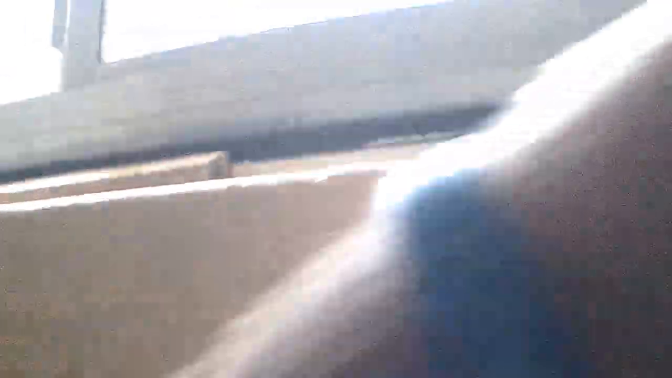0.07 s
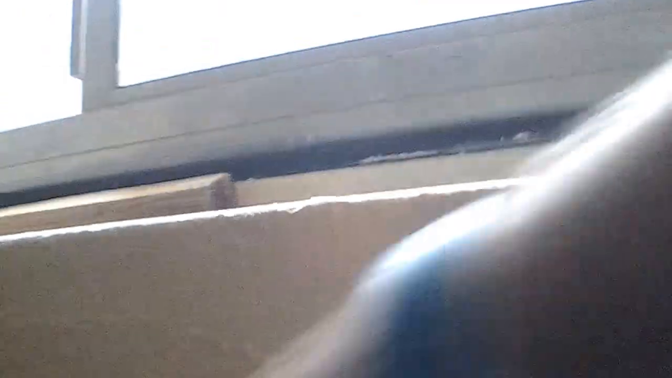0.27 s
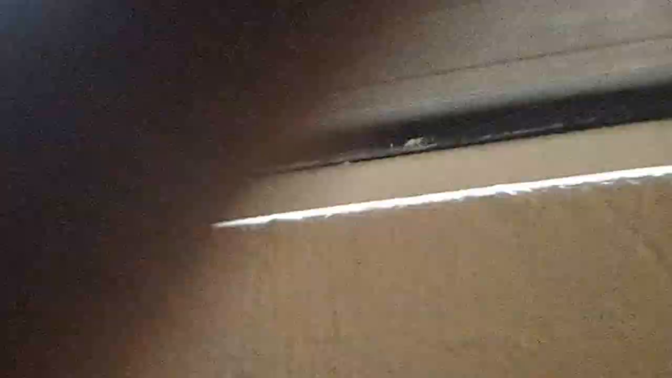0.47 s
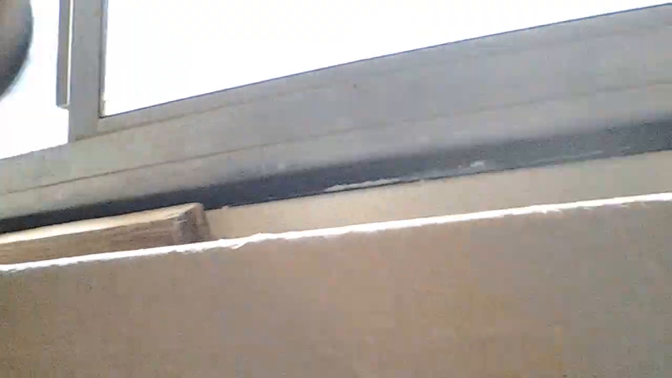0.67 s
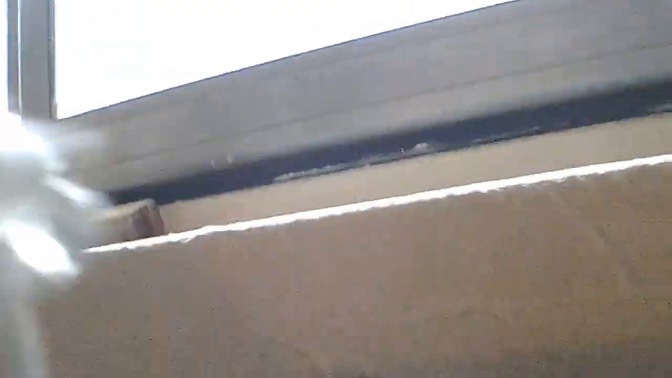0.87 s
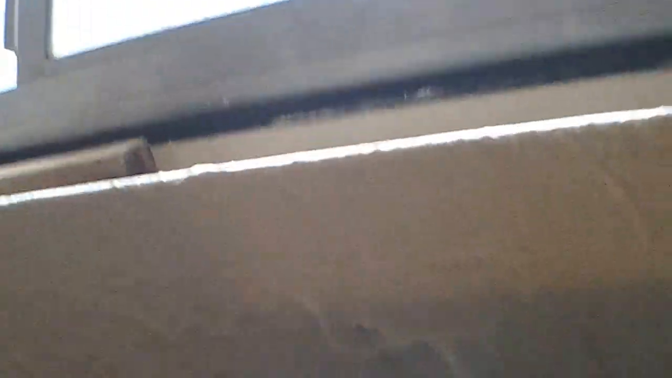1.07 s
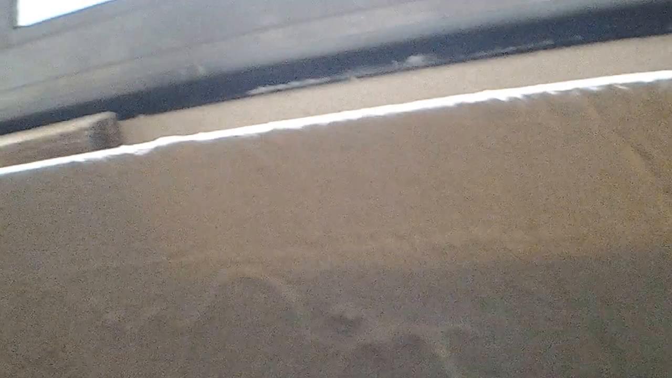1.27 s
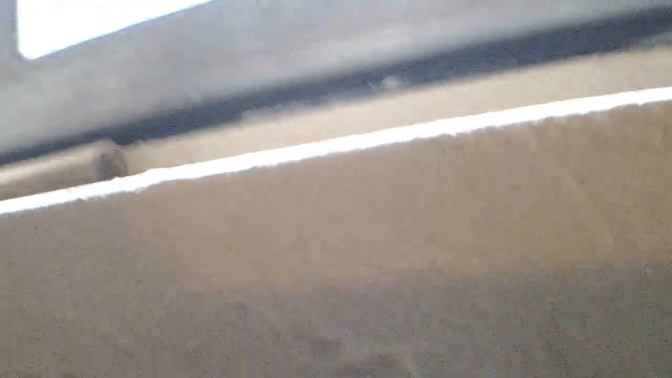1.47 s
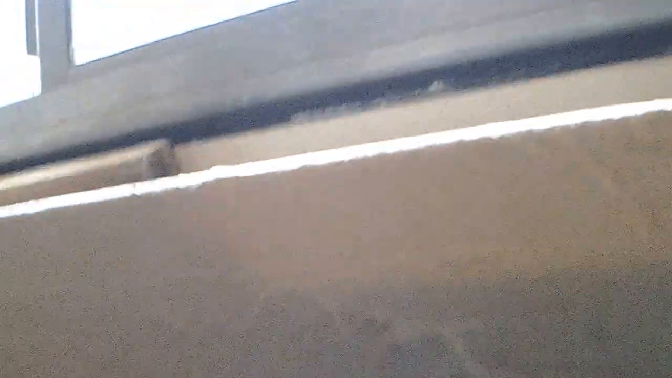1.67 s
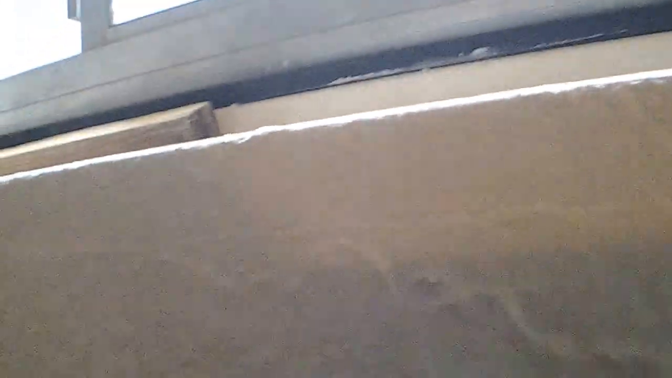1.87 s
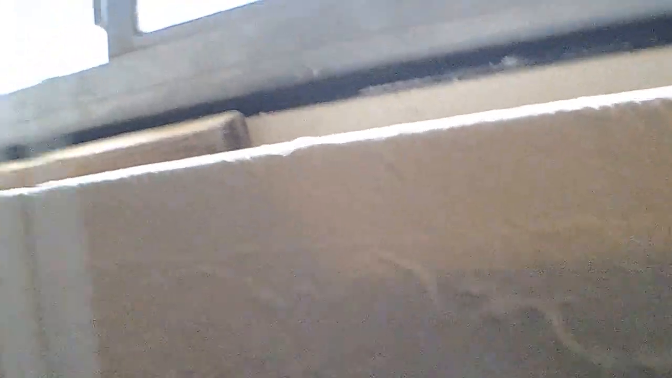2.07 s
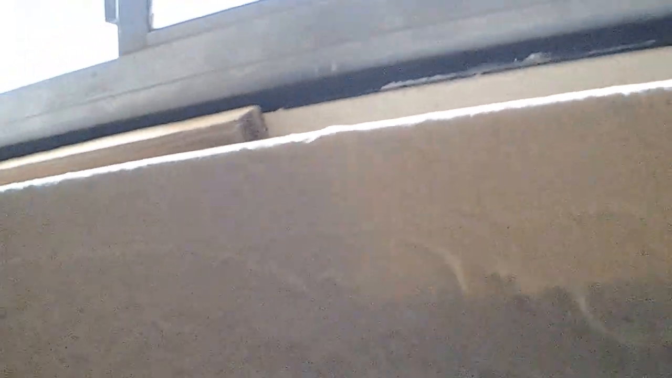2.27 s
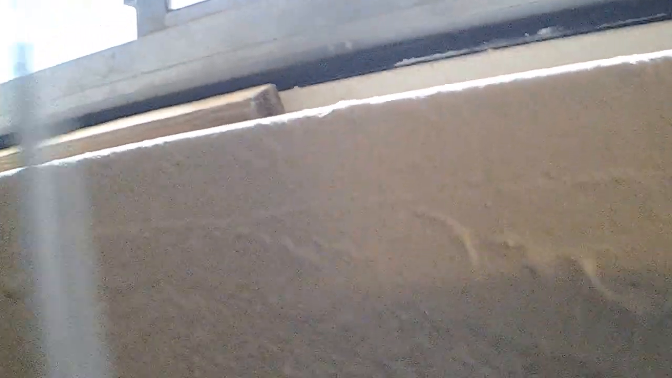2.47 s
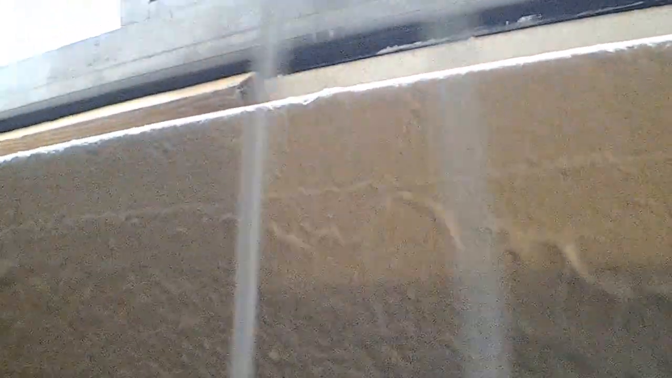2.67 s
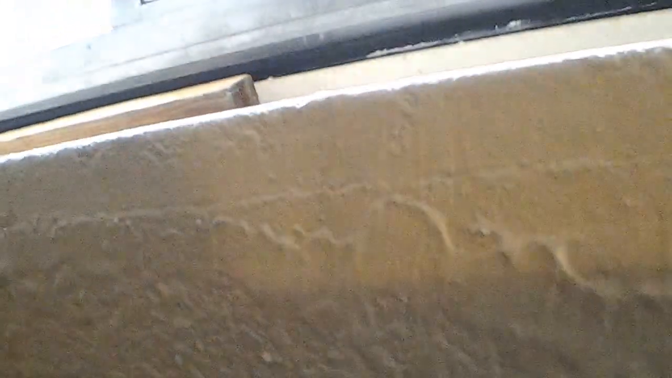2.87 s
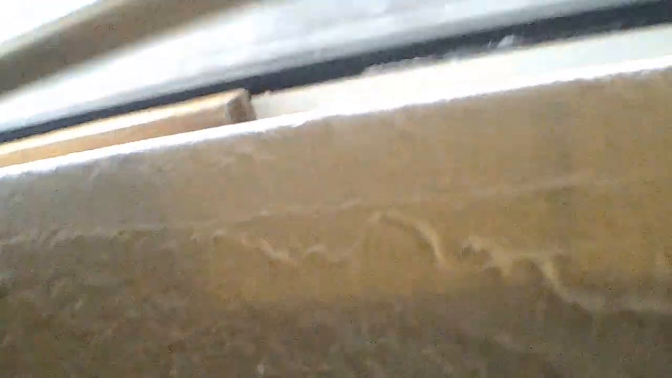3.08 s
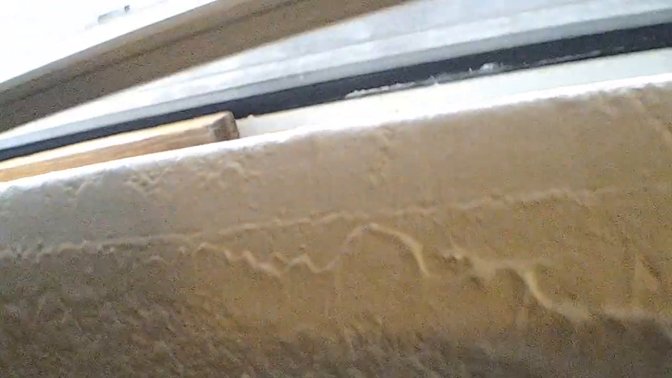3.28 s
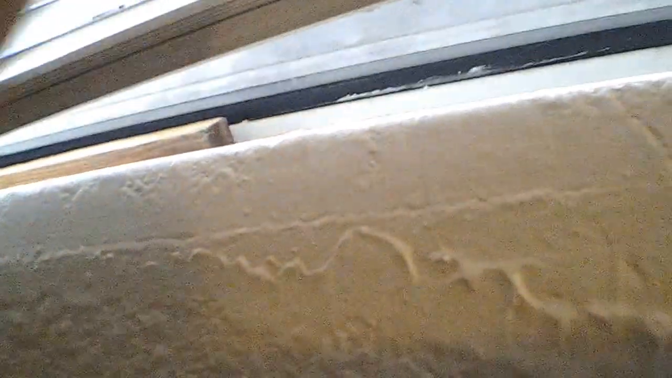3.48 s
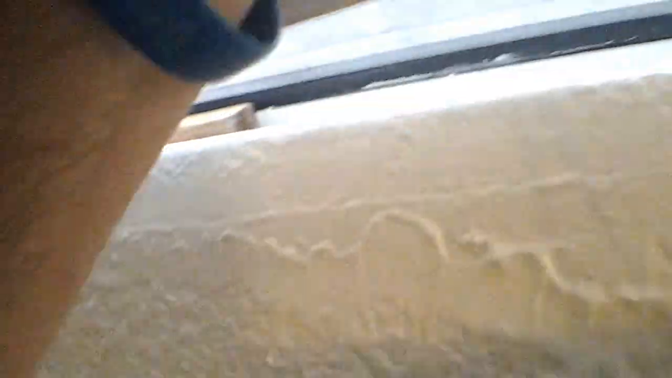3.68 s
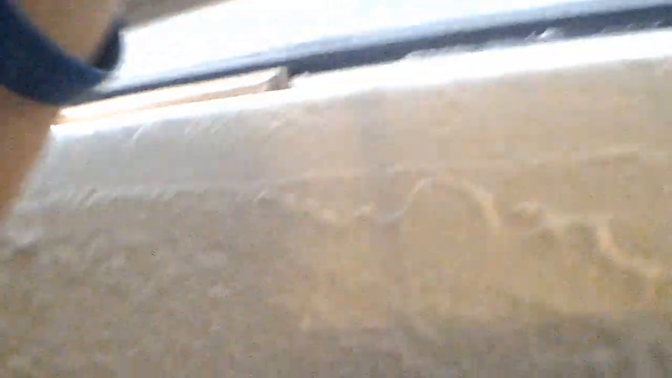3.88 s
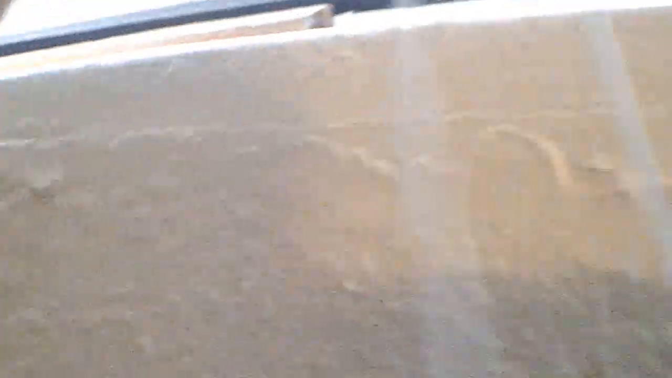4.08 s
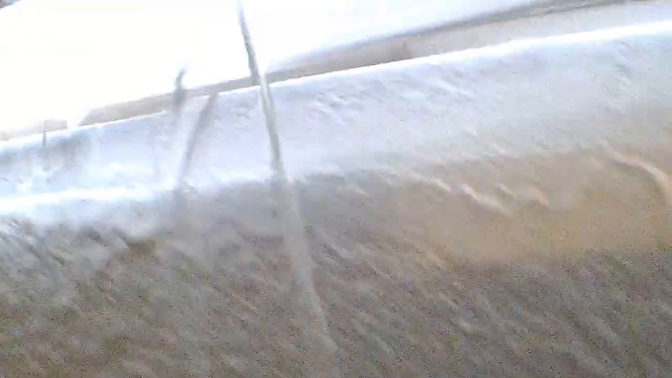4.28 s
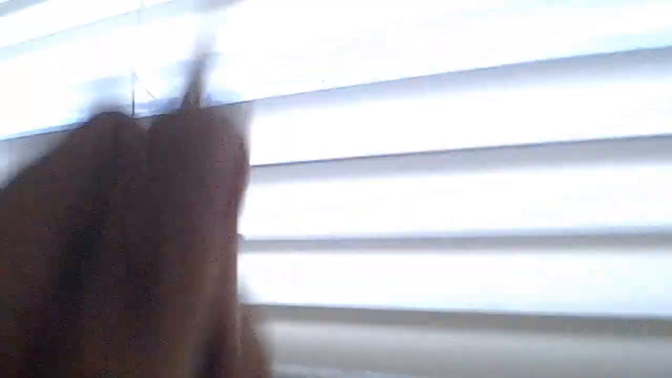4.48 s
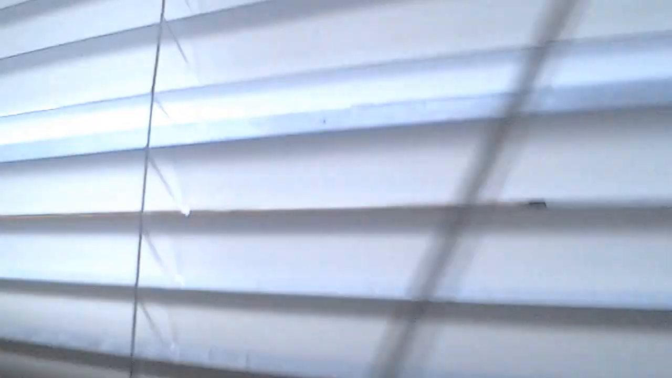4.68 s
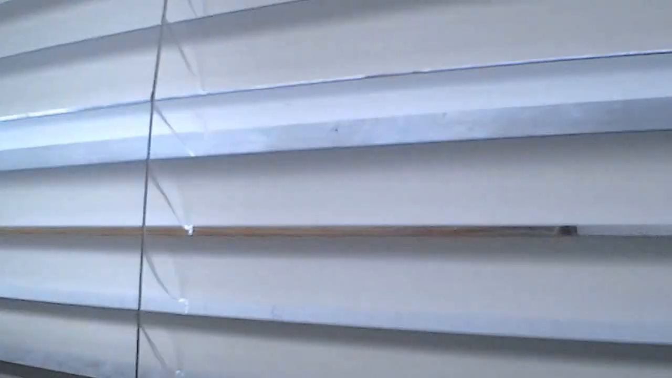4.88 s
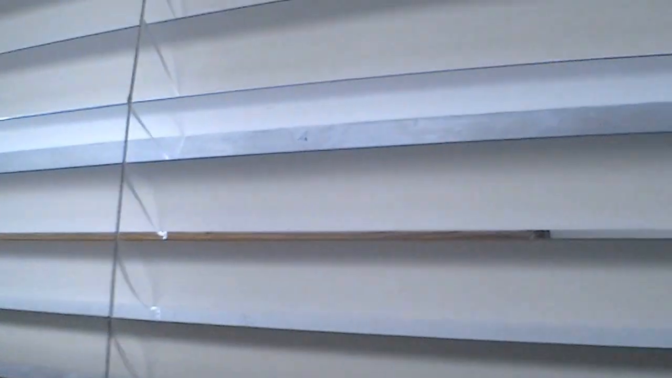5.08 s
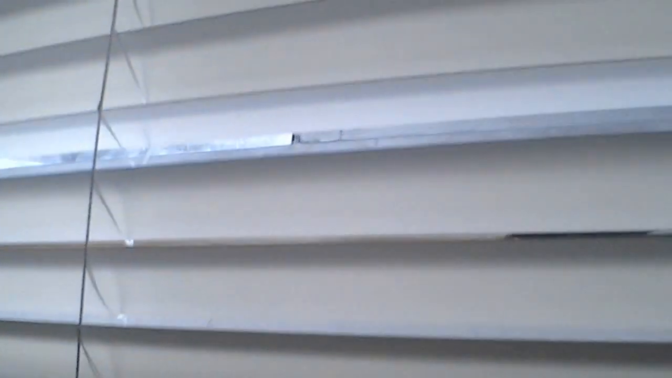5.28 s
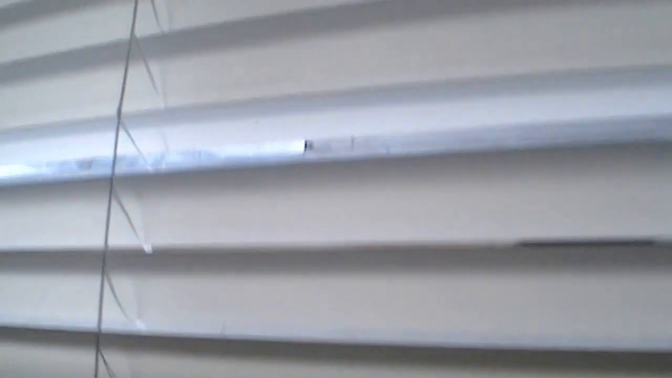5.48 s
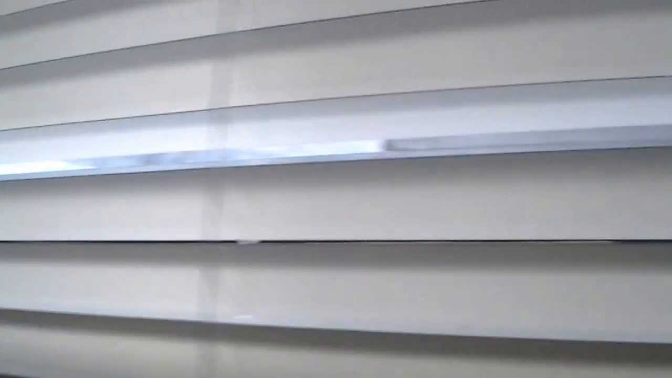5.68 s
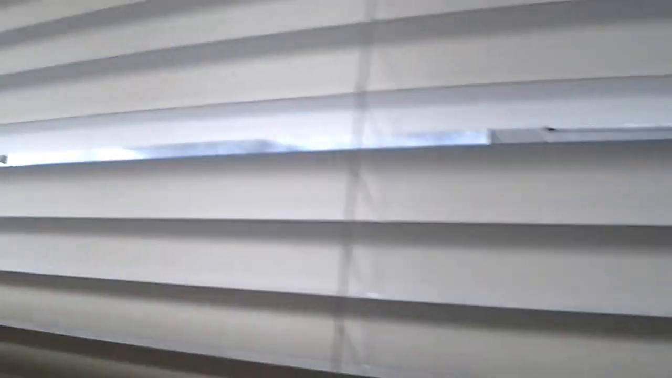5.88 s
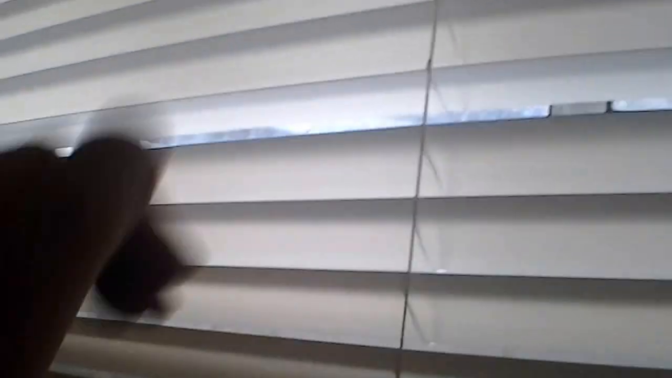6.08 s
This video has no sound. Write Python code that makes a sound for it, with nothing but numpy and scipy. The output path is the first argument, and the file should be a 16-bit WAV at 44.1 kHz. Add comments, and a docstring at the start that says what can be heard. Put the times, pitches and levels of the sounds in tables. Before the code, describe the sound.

Slats of a window blind clatter in bursts close to the microphone, camera bumps thud softly, then the bottom rail cracks down hard and echoes away.

```python
"""Over hiss and a distant rumble in a bare room, the cord pulls a horizontal blind up, close to a hand-held camera.
Filtered noise makes the slats chatter and snap and the cord sing; soft pulses bump the camera while it is held.
The slats chatter again as the blind comes down; the bottom rail lands with a clack of noise and decaying sines
that overloads the microphone. Late slat strikes and one high sine ping fade into the noise tail of the room."""
import sys
import numpy as np
from scipy import signal
from scipy.io import wavfile
from scipy.ndimage import uniform_filter1d

SR = 44100
rng = np.random.default_rng(int(sys.argv[2]) if len(sys.argv) > 2 else 0)


def output_pcm(signal):
    """Save a mono or channel-first signal as 16-bit PCM at the path in sys.argv[1].

    Samples are clipped to [-1, 1] before scaling.
    """
    pcm = np.clip(np.atleast_2d(signal).T, -1, 1) * 32767
    wavfile.write(sys.argv[1], SR, np.round(pcm).astype(np.int16))


N = 269759  # samples
EDGE_HZ = 14750  # upper band limit of the sound


def gain_of(db):
    """Decibels to amplitude."""
    return 10 ** (np.asarray(db) / 20)


def evened(x):
    """Scales to rms 1."""
    return x / np.sqrt(np.mean(x ** 2) + 1e-20)


def read(points, hz):
    """Joins (Hz, value) points on a log-frequency axis."""
    f, value = np.transpose(points)
    return np.interp(np.log(hz + 1), np.log(f + 1), value)


def add(mix, s, sound):
    """Mixes a sound in at time s."""
    part = mix[max(round(s * SR), 0):][:len(sound)]
    part += sound[:len(part)]


def colour(x, points, size=2048):
    """Minimum-phase EQ with the given (Hz, dB) curve, so attacks stay sharp."""
    curve_db = read(points, abs(np.fft.fftfreq(size, 1 / SR)))
    log_gain = np.log(gain_of(curve_db))
    taps = np.fft.ifft(np.exp(np.conj(signal.hilbert(log_gain)))).real
    return signal.oaconvolve(x, taps)[:len(x)]


def band(x, edges, order=4):
    """Band-pass between two frequencies."""
    return signal.sosfilt(signal.butter(order, edges, "band", fs=SR, output="sos"), x)


def resonate(x, hz, width):
    """A resonance of gain 1 at its centre."""
    return signal.lfilter(*signal.iirpeak(hz, hz / max(width, 1), fs=SR), x)


# noise floor EQ, per Hz: f/Hz, relative level/dB
HISS_EQ = [(30, 5.5), (140, 7.5), (250, 0.5), (1000, -4), (5000, -7), (6200, -13), (14500, -9)]
HISS_DB = -64.5  # rms
# rumble EQ, per Hz: f/Hz, relative level/dB
RUMBLE_EQ = [(40, -9), (70, -15.5), (135, -0.5), (320, -1.5), (600, -7), (1300, -12), (9000, -21)]
# rumble fader: t/s, rms level/dB
RUMBLE_LEVEL = [(0, -64.5), (.5, -70), (.8, -57), (3.5, -58.5), (5.101, -63.5), (5.4, -56.5), (6.1, -56)]


def background():
    """Microphone hiss is steady coloured noise; the distant rumble from outside is darker noise that rises and falls."""
    hiss, rumble = rng.standard_normal((2, N))
    rumble_db = np.interp(np.arange(N) / SR, *np.transpose(RUMBLE_LEVEL))
    steady = gain_of(HISS_DB) * evened(colour(hiss, HISS_EQ))
    return steady + gain_of(rumble_db) * evened(colour(rumble, RUMBLE_EQ))


# reverb tail by frequency: f/Hz, t60/s, relative level/dB
ROOM = [(154.3, 1.3, 9.5), (497.4, 1.09, 0.5), (1320, 0.9, -1.5), (3043, 0.65, 0.5), (5660, 0.73, -3),
        (7500, 0.42, 5), (12800, 0.12, 5)]


def room(x, wet_db=-2, build_up=0.0038):
    """Hard walls return a dense noise tail with its own decay at each pitch, shortest at the very top."""
    rows = np.array(ROOM)
    hz, t, z = signal.stft(rng.standard_normal(SR), SR, nperseg=256)
    start_db = read(rows[:, ::2], hz)[:, None]
    t60 = read(rows[:, :2], hz)[:, None]
    tail = signal.istft(z * gain_of(start_db - 60 * t / t60), SR, nperseg=256)[1]
    tail = tail * (1 - np.exp(-np.arange(len(tail)) / SR / build_up))
    return gain_of(wet_db) * signal.fftconvolve(x, tail / np.linalg.norm(tail))[:N]


# soft bumps on the camera: t/s, peak level of the push before the band-pass/dB
BUMPS = [(2.238, -39), (2.5453, -25), (2.626, -25), (2.644, -21), (2.6623, -23), (2.675, -30),
         (2.695, -31.5), (2.766, -22), (2.81, -32), (2.8262, -21.5), (2.854, -31), (2.868, -34),
         (2.881, -31), (2.903, -35), (2.9153, -25.5), (2.965, -27.5), (3.01, -37), (3.089, -35),
         (3.161, -42)]


def bumps(hz=240, octaves_per_db=0.025, scatter_octaves=0.14, knock_db=-25, low_hz=80):
    """Each bump is one push and rebound of the camera body, on average quicker when harder, with a dull knock."""
    out, t = np.zeros(N), np.arange(-SR // 50, SR // 50) / SR
    hardest_db = max(db for s, db in BUMPS)
    for s, db in BUMPS:
        octaves = octaves_per_db * (db - hardest_db) + scatter_octaves * rng.standard_normal()
        turn = np.pi * hz * 2 ** octaves * t
        push = np.exp(-turn ** 2)
        rebounding = (1 - 2 * turn ** 2) * push
        knock = evened(band(rng.standard_normal(len(t)), (300, 800), order=2)) * np.sqrt(push)
        add(out, s + t[0], gain_of(db) * (rebounding + gain_of(knock_db) * knock))
    return band(out, (low_hz, EDGE_HZ))


# tiny sharp ticks next to the microphone: t/s, peak level/dB
TICKS = [(1.2, -32.5), (1.475, -27)]


def ticks(t60=0.0076, low_hz=3500, size=600):
    """Dry, bright noise bursts, over in a few milliseconds."""
    out, t = np.zeros(N), np.arange(size) / SR
    for s, db in TICKS:
        tick = band(rng.standard_normal(size) * gain_of(-60 * t / t60), (low_hz, EDGE_HZ), order=2)
        add(out, s, gain_of(db) * tick / abs(tick).max())
    return out


# a small metal part pings: t/s, f/Hz, starting peak level/dB, t60/s
PING = (5.512, 7375, -61, 0.36)


def ping():
    """A light touch sets one high, clear mode ringing."""
    s, hz, db, t60 = PING
    out, t = np.zeros(N), np.arange(SR // 2) / SR
    add(out, s, gain_of(db - 60 * t / t60) * np.sin(2 * np.pi * hz * t))
    return out


# the running cord sings in its pulley: t/s, length/s, f/Hz, width/Hz, level before fades and mix/dB
SQUEALS = [(0.808, 0.12, 2630, 140, -63), (1.428, 0.17, 397, 280, -49.5), (1.66, 0.23, 3450, 600, -45),
           (2.269, 0.11, 630, 220, -45.5), (2.27, 0.125, 1280, 200, -42.5), (4.27, 0.18, 1760, 50.7, -42.5),
           (4.272, 0.13, 3230, 99.3, -41.5)]


def pulley():
    """The sliding cord drives fuzzy resonances, each with soft ends."""
    out = np.zeros(N)
    for s, length, hz, width, db in SQUEALS:
        rub = rng.standard_normal(round(length * SR))
        tone = resonate(resonate(rub, hz, width), hz, width)
        add(out, s, gain_of(db) * evened(tone) * signal.windows.tukey(len(tone), .3))
    return out


# resonances of the hanging slats, heard in every strike and in the chatter: f/Hz, relative level/dB
SLAT_MODES = [(1010, 0), (1320, -4.5), (1770, -6), (2120, -5), (3360, -3.5), (5050, -10.5), (6750, -0.5)]
SLAT_WIDTH_HZ = 61


def slat_body(x, strength_db=0):
    """Adds the resonances that all slats share."""
    return x + sum(gain_of(db + strength_db) * resonate(x, hz, SLAT_WIDTH_HZ) for hz, db in SLAT_MODES)


# pulls and slides that set the slats moving:
# t/s, length/s, level at start before mix/dB, level at end before mix/dB, treble tilt/(dB per octave)
STROKES = [(0.647, 0.17, -51.5, -53, 4.5), (0.957, 0.19, -38, -46, 1.5), (1.422, .12, -40.5, -46.5, 0.9),
           (1.63, 0.31, -44, -29.5, 2.5), (1.936, 0.28, -30.5, -33.5, 0.9), (2.263, 0.13, -47, -42, -0.5),
           (2.367, 0.1, -37.5, -30.5, 1), (2.506, 0.24, -36.5, -36, 1.5), (2.656, 0.35, -32.5, -42.5, 1),
           (3.005, 0.17, -36, -43, 1.5), (3.614, 0.14, -53.5, -60.5, 4.5), (3.858, 0.22, -45.5, -36.5, 1.5),
           (4.22, 0.059, -37, -38, 3), (4.271, 0.2, -35, -26, 4), (4.557, 0.13, -36, -33, 2.5),
           (5.362, 0.29, -56, -67, 1.5)]
CATCH_S, SETTLE_T60 = .042, 0.33  # fade-in of every stroke and its decay afterwards, both in s


def motion(t):
    """Amplitude and tilt of the chatter: each stroke catches, slides evenly in level, then settles."""
    power, tilt = np.full(len(t), 1e-14), np.zeros(len(t))
    for s, length, start_db, end_db, tilt_db in STROKES:
        db = np.interp(t, [s, s + length], [start_db, end_db])
        db = db - 60 * np.maximum(t - s - length, 0) / SETTLE_T60
        stroke = (np.clip((t - s) / CATCH_S, 0, 1) * gain_of(db)) ** 2
        power, tilt = power + stroke, tilt + stroke * tilt_db
    return np.sqrt(power), tilt / power


def clacks(per_s=170, spread_db=3, t60=0.019, resonance_db=15, width_hz=150, low_hz=1500, high_hz=5500,
           count=60, size=1500):
    """Single slats knock together at random, each with a main resonance of its own."""
    out, t = np.zeros(N), np.arange(size) / SR
    bursts = rng.standard_normal((count, size)) * gain_of(-60 * t / t60)
    pitches = np.geomspace(low_hz, high_hz, count)
    rings = [evened(burst + gain_of(resonance_db) * resonate(burst, hz, width_hz))
             for burst, hz in zip(bursts, pitches)]
    slat, force = rng.integers(0, count, N), np.minimum(rng.exponential(1, N), 2)
    # one slat follows the next at uneven gaps
    times = np.cumsum(rng.gamma(2, .5 / per_s, N))
    for i in np.round(times[times < N / SR - 1 / SR] * SR).astype(int):
        add(out, i / SR, gain_of(spread_db * force[i]) * rings[slat[i]])
    return evened(out)


# chatter EQ, per Hz: f/Hz, relative level/dB
CHATTER_EQ = [(100, -35.5), (156, -24.5), (237, -16), (622, -4.5), (840, -7), (1550, -5), (1800, -3),
              (5000, -6.5), (6100, -15.5), (8610, -26), (12400, -35), (14500, -60.5)]


def chatter(level_db=0, ticks_per_s=350, spread_db=2.0, tick_t60=0.082, rub=0.96, clack_share=0.62,
            blur_per_tilt=0.2, patchy_db=1.9):
    """Moving slats tick and clack at random over the rub of the cord; brighter strokes blur into a slide."""
    t = np.arange(N) / SR
    level, tilt = (np.interp(t, t[::64], control) for control in motion(t[::64]))
    struck = rng.random(N) < ticks_per_s / SR
    sizes = gain_of(spread_db * np.minimum(rng.exponential(1, N), 4)) * struck
    power = signal.lfilter([1], [1, -10 ** (-6 / (tick_t60 * SR))], sizes ** 2)
    slide = evened(np.sqrt(power / power.mean() + rub) * rng.standard_normal(N))
    share = np.clip(clack_share - blur_per_tilt * tilt, 0, .8)
    blend = np.sqrt(1 - share) * slide + np.sqrt(share) * clacks()
    hz, frame_s, z = signal.stft(slat_body(colour(blend, CHATTER_EQ)), SR, nperseg=256)
    # other slats touch from moment to moment, so the colour shifts in patches
    patches = uniform_filter1d(rng.standard_normal(z.shape), 4, axis=0)
    patches = evened(uniform_filter1d(patches, 8, axis=1))
    octaves = np.log2(np.clip(hz, 700, 10000) / 2800)[:, None]
    tilt_db = octaves * np.interp(frame_s, t, tilt)
    slats = evened(signal.istft(z * gain_of(patchy_db * patches + tilt_db), SR, nperseg=256)[1][:N])
    return gain_of(level_db) * level * slats


# slats and cord lock striking: t/s, level at 1.8-4.4 kHz before trim and envelope/dB,
# body relative to that level/dB, edge relative to that level/dB, main resonance f/Hz
CLICKS = [(0.6963, -38, -8.5, -9, 3350), (0.7365, -38, 7.5, -6, 1000), (0.8405, -43, -9, -7, 2700),
          (0.9306, -33.5, -10, -6.5, 4460), (0.9759, -23, -5, -10, 2500), (0.9885, -22.5, -7, -5.5, 2290),
          (1.0329, -23, -4.5, -10.5, 1900), (1.4367, -35.5, -6, -6, 3870), (1.5279, -34, -3, -12, 2716),
          (1.791, -28, -11, -9, 3350), (1.9095, -9, -15.5, 3, 5380), (1.9261, -14, -5, 3.5, 5300),
          (1.9322, -12.5, -11, -2, 5230), (2.0485, -20.5, -21, -9.5, 3480), (2.1026, -18.5, -22, -20, 3650),
          (2.128, -19, -15, -16, 3380), (2.198, -20.5, -18, -15, 2200), (2.431, -25, -16, -8.5, 3900),
          (2.455, -23, -9, -14, 2640), (2.695, -25.5, -7, -12, 3350), (2.931, -41.5, -10, 7.5, 6500),
          (3.1015, -29, -12, -13.5, 3030), (3.1712, -27.5, -7.5, -31.5, 2340), (3.5623, -35.5, 1, -8, 770),
          (3.8857, -21, -16.5, -12, 3600), (4.0395, -24.5, -15, -20, 1920), (4.072, -21.5, -13, -20, 2400),
          (4.2339, -33, -8.5, -4, 3270), (4.4653, -8.5, -20.5, -0.5, 5430), (4.484, -11.5, -15, -7, 5020),
          (4.4986, -14.5, -11, -0.5, 5180), (4.6988, -18.5, -12.5, -4.5, 4900),
          (4.784, -22, -8, -7.5, 2440), (5.2900, -41, -10, -20, 2500), (5.3259, -32, -7.5, -12, 4400),
          (5.336, -32.5, -11, -15, 2400), (5.5113, -44.5, -5, 4.5, 7540), (5.5487, -31.5, -7.5, -7.5, 4860),
          (5.6253, -37.5, -2.5, -7, 4258), (5.6693, -41, -17, -8, 3200), (5.8846, -32, -2.5, -11, 1230)]
# bands of a strike (body, reference, edge, fizz): low f/Hz, high f/Hz
CLICK_BANDS = [(300, 1400), (1800, 4400), (4700, 8500), (8500, 14500)]
# strike EQ: f/Hz, level/dB
SNAP_EQ = [(100, -13), (400, -4.5), (700, -6.5), (1100, -1), (6000, -1.5), (7800, -15), (12000, -12.5),
           (14500, -32.5)]
# a strike with more edge also has more fizz above 8.5 kHz: dB at an edge of 0 dB, dB per dB of edge
FIZZ_DB, FIZZ_PER_EDGE = -19.5, 0.61


def clicks(level_db=-4, rise=0.00096, contact=0.0015, soft_t60=0.052, hard_t60=0.017, resonance_db=9,
           width_hz=320, shared_db=-6, size=6000):
    """A strike buzzes through the contact, then the slat's dense modes die fast, sooner after a hard, edgy snap."""
    out, t = np.zeros(N), np.arange(size) / SR
    for s, db, body_db, edge_db, hz in CLICKS:
        t60 = np.interp(edge_db, [-8, 3], [soft_t60, hard_t60])
        shape = (1 - np.exp(-t / rise)) * gain_of(-60 * np.maximum(t - contact, 0) / t60)
        ring = slat_body(colour(rng.standard_normal(size) * shape, SNAP_EQ), shared_db)
        ring = ring + gain_of(resonance_db) * resonate(ring, hz, width_hz)
        fizz_db = FIZZ_DB + FIZZ_PER_EDGE * edge_db
        parts = zip(CLICK_BANDS, (body_db, 0, edge_db, fizz_db))
        strike = sum(gain_of(part_db) * evened(band(ring, edges)) for edges, part_db in parts)
        add(out, s, gain_of(db + level_db) * np.std(shape) * strike)
    return out


# the bottom rail lands and bounces: t/s, blow level before trim and envelope/dB
LANDING = [(4.5191, -2.5), (4.5251, -11), (4.5336, -11)]
# EQ of the rail's crack on the sill: f/Hz, relative level/dB
CRACK_EQ = [(60, -51), (280, -12.5), (800, -8), (1400, -3.5), (2200, 0), (3500, -1), (5800, -2),
            (7300, -11.5), (9300, -23), (11500, -11.5), (14500, -17)]
# ring of the bottom rail: f/Hz, level before swell and damping/dB, undamped t60/s
BOTTOM_RAIL = [(1077, -13, 0.088), (1373, -6.5, 0.85), (2060, -13.5, 0.068), (2435, -7, 0.096),
               (3030, -8, 0.05)]


def landing(crack_db=-0.5, rise=0.00018, contact=.003, crack_t60=0.019, ring_rise=0.013, rest_after=0.0025,
            rest_t60=0.03, linger_db=-21, beat_hz=19):
    """Blows crack on the sill; the hollow rail's ring swells as it bounces, is damped at rest, lingers and beats."""
    cracks, rings, t = np.zeros(N), np.zeros(N), np.arange(SR) / SR
    shape = (1 - np.exp(-t / rise)) * gain_of(-60 * np.maximum(t - contact, 0) / crack_t60)
    for s, blow_db in LANDING:
        crack = np.std(shape) * evened(colour(rng.standard_normal(len(t)) * shape, CRACK_EQ))
        add(cracks, s, gain_of(blow_db + crack_db) * crack)
    ring = sum(gain_of(db - 60 * t / t60) * np.sin(2 * np.pi * hz * t) for hz, db, t60 in BOTTOM_RAIL)
    first_s, last_s = LANDING[0][0], LANDING[-1][0]
    # time since the rail came to rest
    lying_s = np.maximum(t + contact - (last_s - first_s) - rest_after, 0)
    damper = gain_of(-60 * lying_s / rest_t60) + gain_of(linger_db) * np.cos(np.pi * beat_hz * lying_s)
    add(rings, first_s + contact, ring * (1 - np.exp(-t / ring_rise)) * damper)
    return cracks, rings


def scene(click_room_db=-3, chatter_room_db=-3, rail_room_db=-8, ring_room_db=-10, direct_db=-1,
          slat_low_hz=170, rail_low_hz=450):
    """The blinds and their echo reach a single microphone that feeds both channels."""
    strikes = clicks() + ping()
    slats = band(chatter() + pulley(), (slat_low_hz, EDGE_HZ), order=3)
    crack, ring = landing()
    # the rail lands right beside the microphone, so it is driest; being slim, its crack sends little bass out
    radiated_crack = gain_of(rail_room_db) * band(crack, (rail_low_hz, EDGE_HZ), order=2)
    radiated = radiated_crack + gain_of(ring_room_db) * ring
    echo = room(gain_of(click_room_db) * strikes + gain_of(chatter_room_db) * slats + radiated)
    blinds = strikes + gain_of(direct_db) * slats + crack + ring
    mono = blinds + echo + ticks() + bumps() + background()
    return np.array([mono, mono])


def record(dry, self_noise_db=-86, low_cut_hz=70):
    """Each channel adds faint noise of its own and clips at full scale; then the low cut and the band limit."""
    clipped = np.clip(dry + gain_of(self_noise_db) * rng.standard_normal(dry.shape), -1, 1)
    thinned = signal.sosfilt(signal.butter(1, low_cut_hz, "high", fs=SR, output="sos"), clipped)
    low_pass = signal.firwin(255, EDGE_HZ, window=("kaiser", 8), fs=SR)
    return signal.oaconvolve(thinned, low_pass[None], "same")


dry = scene()
out = record(dry)
output_pcm(out)
```